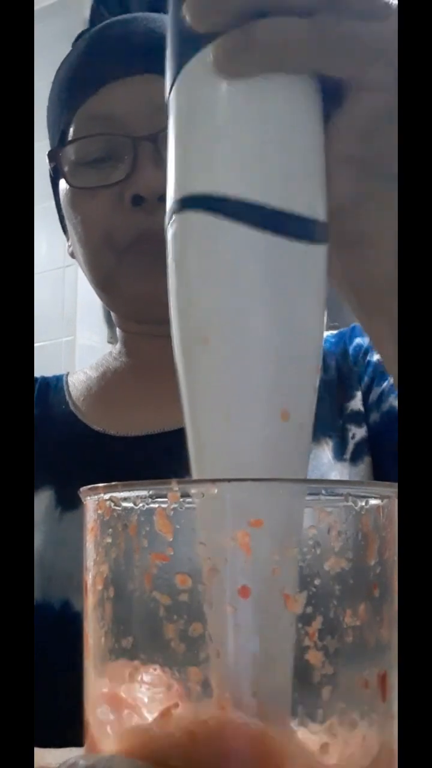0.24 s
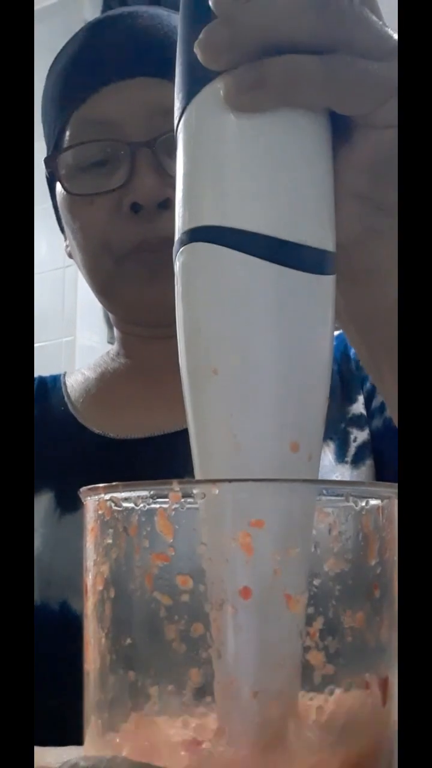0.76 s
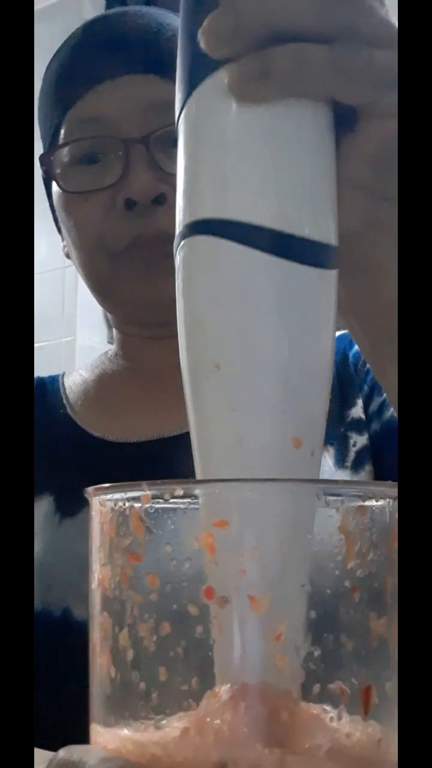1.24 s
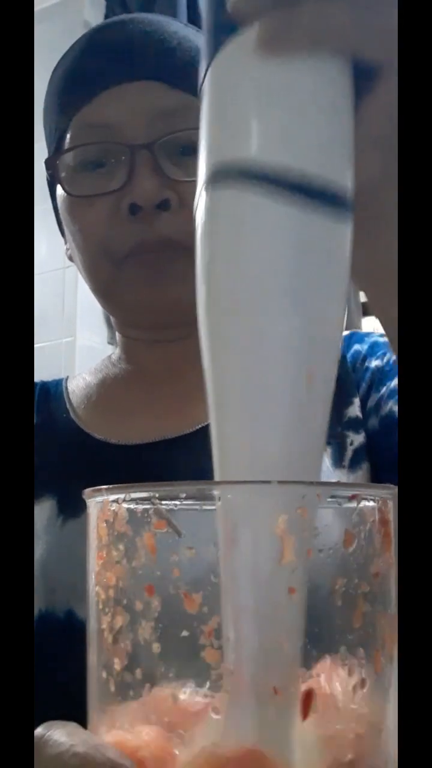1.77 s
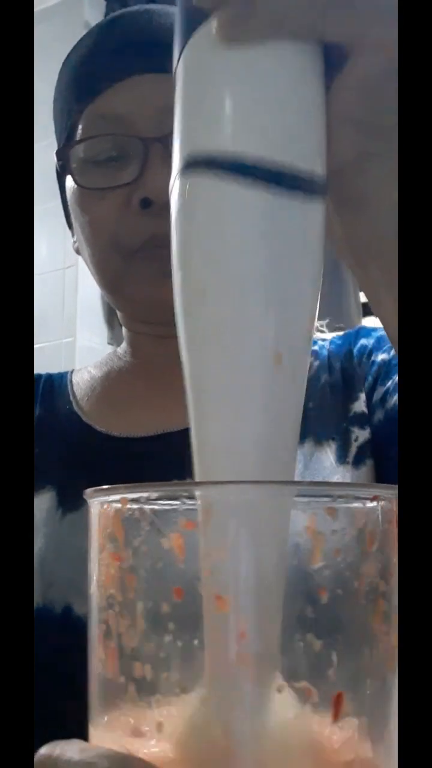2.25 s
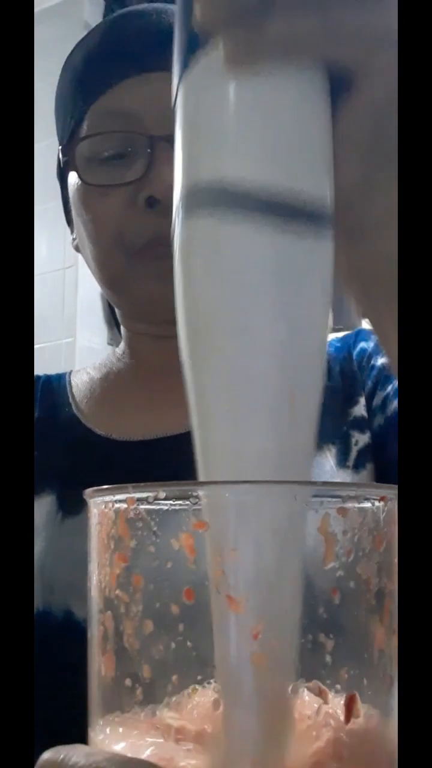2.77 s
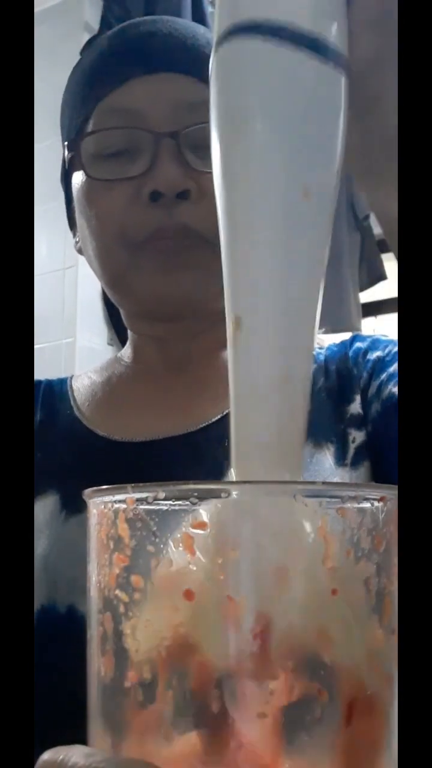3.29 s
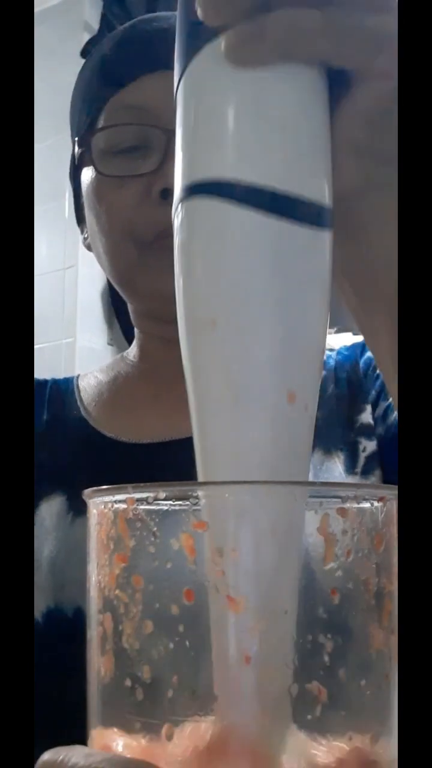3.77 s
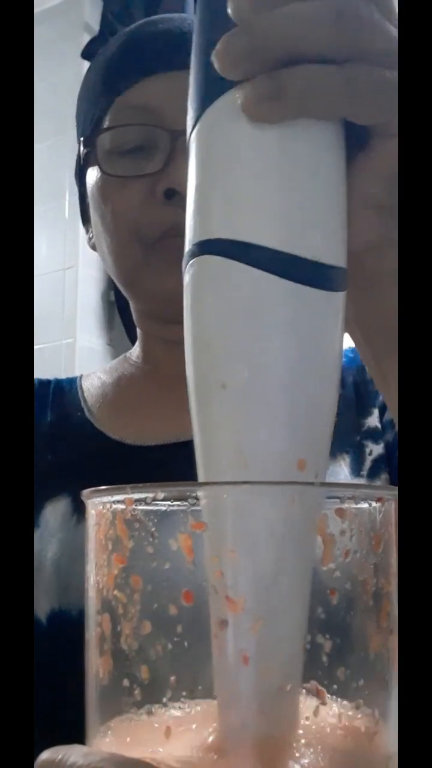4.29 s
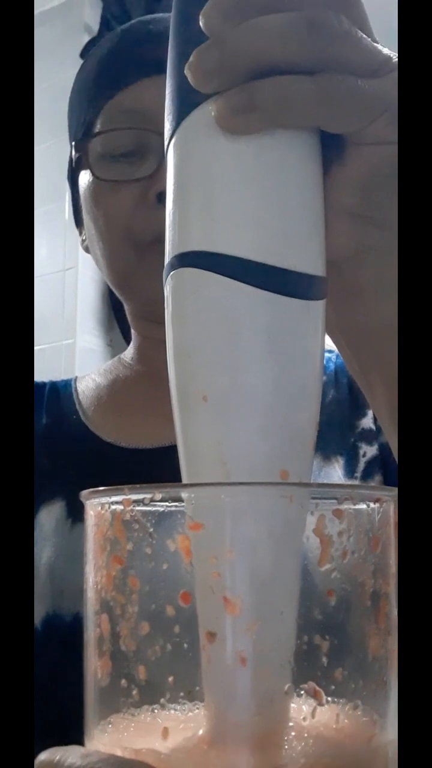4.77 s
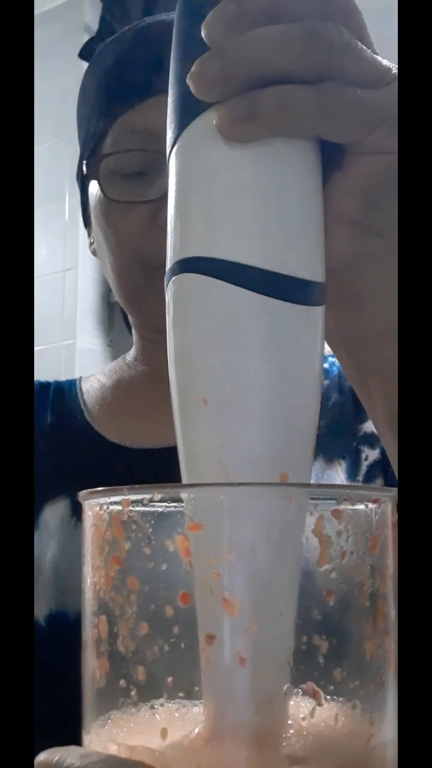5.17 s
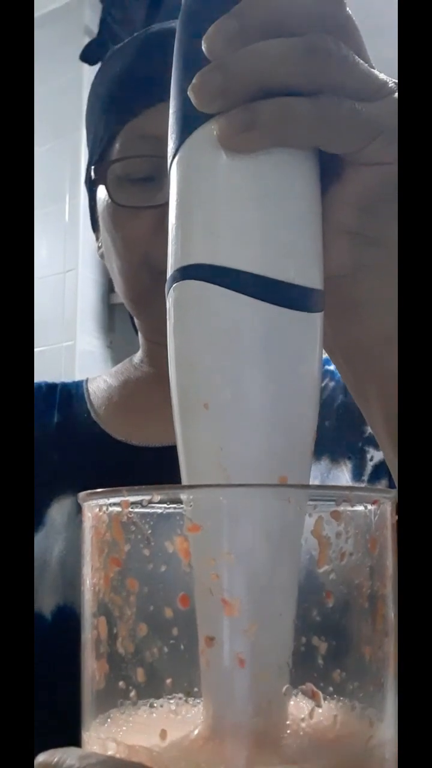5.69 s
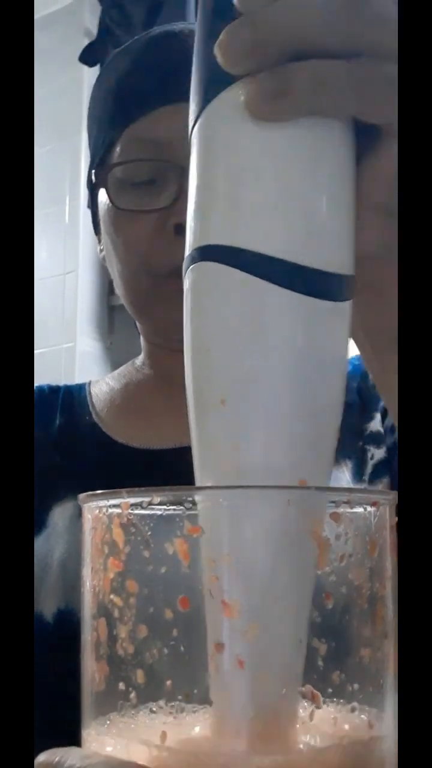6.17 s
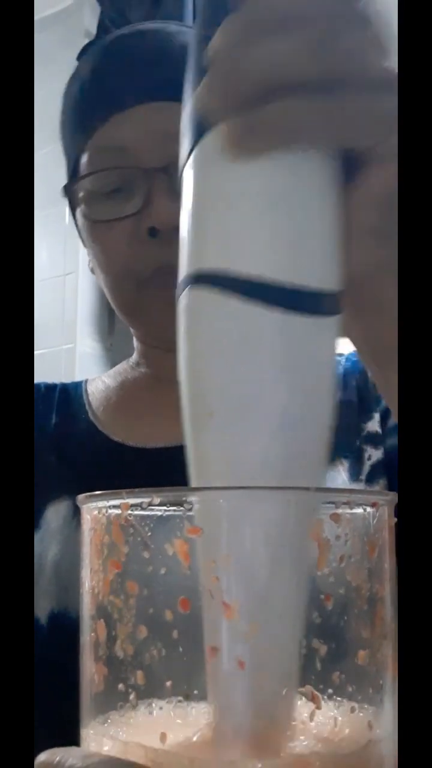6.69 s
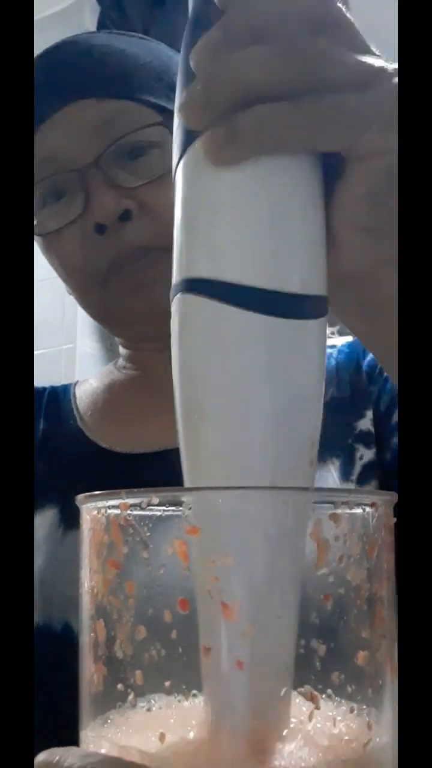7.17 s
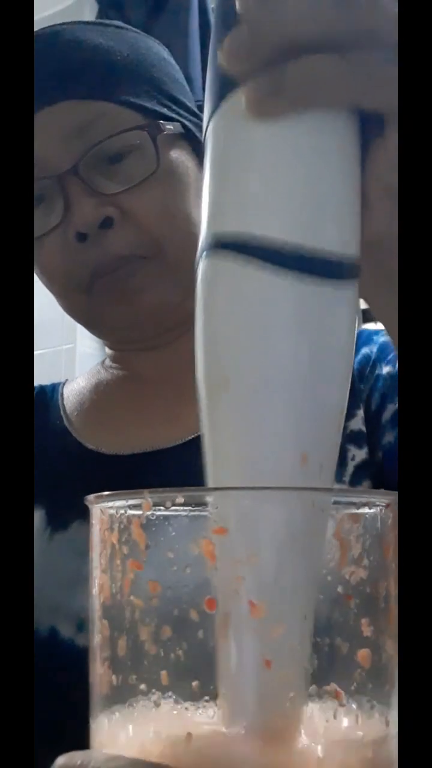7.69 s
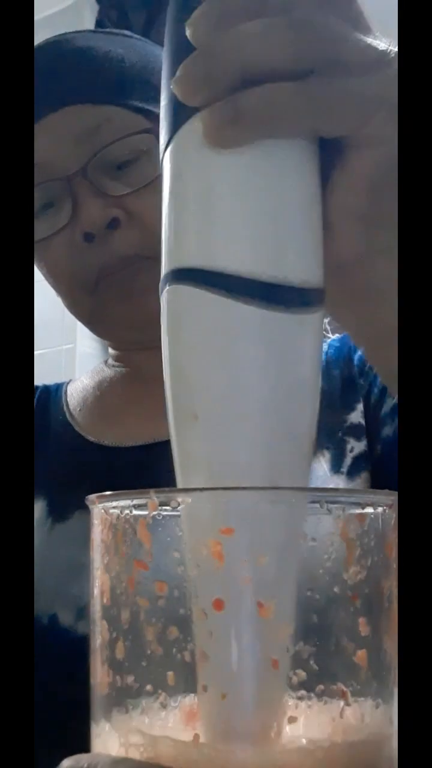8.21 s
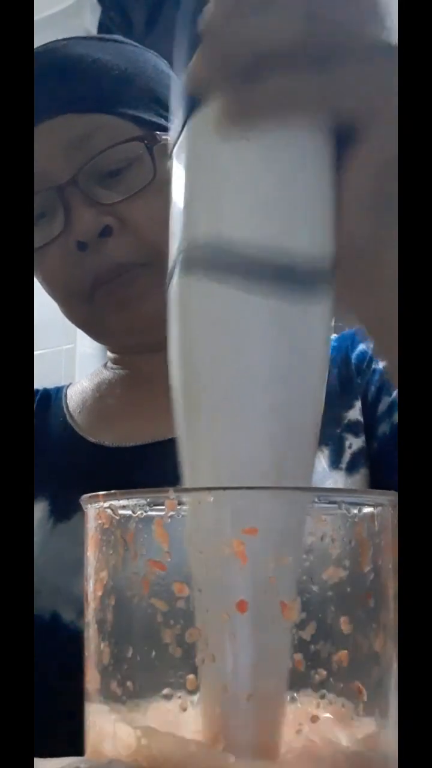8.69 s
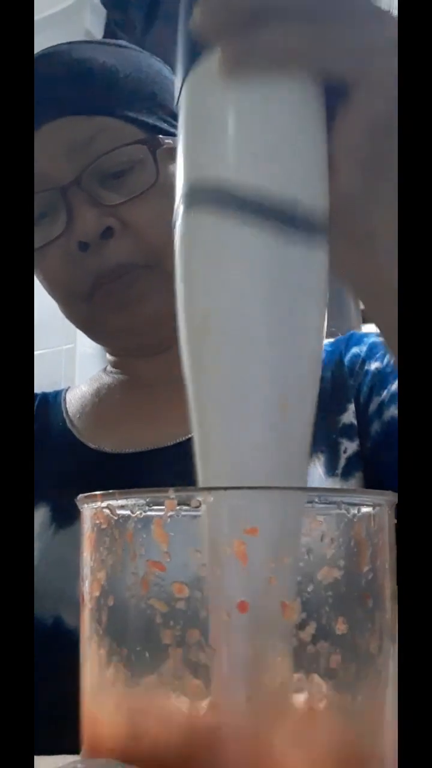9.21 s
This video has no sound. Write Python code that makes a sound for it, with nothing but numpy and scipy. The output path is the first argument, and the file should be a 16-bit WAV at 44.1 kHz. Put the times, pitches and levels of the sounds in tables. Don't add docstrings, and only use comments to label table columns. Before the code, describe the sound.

Close-up pulsing stick blender churns chunky pulp with a rough rattling roar, one longer smoother run mid-way, chunks snapping and motor coasting down in gaps.

```python
import sys
import numpy as np
from scipy import signal
from scipy.fft import rfft, irfft, next_fast_len
from scipy.io import wavfile
from scipy.ndimage import uniform_filter1d

SR = 44100
rng = np.random.default_rng(int(sys.argv[2]) if len(sys.argv) > 2 else 0)


def volts_from_decibels(level):
    exponent = np.asarray(level, float) / 20
    return 10 ** exponent


def digitize_waveform(pressure):
    field = np.atleast_2d(pressure).T
    bounded = np.clip(field, -1, 1)
    quanta = np.round(bounded * 32767).astype(np.int16)
    wavfile.write(sys.argv[1], SR, quanta)


N = 416744
MAINS_HZ = 50


def evened(x):
    return x / np.sqrt(np.mean(x ** 2) + 1e-20)


def read(points, hz):
    f, value = np.transpose(points)
    return np.interp(np.log(hz + 1), np.log(f + 1), value)


def add(mix, s, sound):
    part = mix[round(s * SR):][:len(sound)]
    part += sound[:len(part)]


def shape(x, gain):
    size = next_fast_len(N)
    return irfft(rfft(x, size) * gain(np.fft.rfftfreq(size, 1 / SR)), size)[..., :N]


def band(x, lo_hz, hi_hz):
    return shape(x, lambda f: 1 / np.sqrt((1 + (lo_hz / (f + 1)) ** 8) * (1 + (f / hi_hz) ** 8)))


# switch on in seconds, switch off in seconds, loaded speed in Hz, spin-up time in seconds,
# speed gain in Hz per second.
PRESSES = [(-.2, .255, 104, .03, 0), (.255, .82, 98, .05, 38), (1.015, 1.36, 109, .02, 37),
           (1.36, 1.885, 100, .03, 24), (2.095, 2.42, 103, .045, 36), (2.652, 2.88, 107, .01, 35),
           (3.648, 4.6, 105, .02, 12), (4.6, 5.4, 124, .08, 29), (5.4, 6.12, 148, .05, 20),
           (6.12, 6.607, 162, .05, -14), (6.95, 7.435, 151, .035, 20), (7.795, 8.21, 105, .03, 30),
           (8.21, 8.41, 110, .025, 35), (8.595, 9.09, 104, .025, 30), (9.09, 9.43, 108, .03, 35)]


def rotor():
    drag_per_s, friction_hz, rest_hz = 3.5, 25, 6
    t = np.arange(0, N / SR + .002, .001)
    hz, target, powered = 0 * t, 0 * t, 0 * t
    press = np.zeros(len(t), int)
    speed = rest_hz
    for k, (on, off, loaded_hz, spin_up, gain) in enumerate(PRESSES):
        next_on = PRESSES[k + 1][0] if k + 1 < len(PRESSES) else N

        def run(s):
            return loaded_hz + gain * (s - on) + (speed - loaded_hz) * np.exp(-(s - on) / spin_up)

        def coast(s):
            falling = (run(off) + friction_hz) * np.exp(-drag_per_s * (s - off)) - friction_hz
            return np.maximum(falling, rest_hz)

        now = (t >= on) & (t < next_on)
        s = t[now]
        hz[now] = np.where(s < off, run(s), coast(s))
        powered[now] = s < off
        press[now] = k
        target[now] = loaded_hz + gain * (np.minimum(s, off) - on)
        speed = coast(next_on)
    return t, hz, target, press, powered


def torque(powered):
    return powered * np.cos(2 * np.pi * MAINS_HZ * np.arange(N) / SR)


def bells(rows, t):
    s, width, *cols = np.transpose(rows)
    return np.exp(-.5 * ((t[:, None] - s) / width) ** 2), cols


# beaker boom in dB, spray and brush hiss in dB,
# unbalance hum in dB, commutator whine in dB.
LOADS = [(-17, -30.5, -39, -42), (-17, -31, -41, -42), (-18, -30.5, -38, -41), (-18.5, -28.5, -41.5, -46),
         (-18.5, -30.5, -36.5, -45), (-17.5, -30.5, -43, -47), (-17, -28, -38.5, -51),
         (-17.5, -27.5, -33.5, -43), (-18.5, -28.5, -26, -39.5), (-18.5, -27.5, -25.5, -37),
         (-21.5, -28.5, -31, -40.5), (-17, -28.5, -44, -47), (-16.5, -30, -49, -49),
         (-18.5, -33, -41.5, -44), (-15, -28.5, -42, -47)]
FOOT_DB = [-8, -10, -16, -10.5, -9.5, -11.5, -5.5, -6.5, -12, -13.5, -17, -28, -19, -14, -10.5]
# middle in seconds, width in seconds,
# boom change in dB, spray change in dB.
SURGES = [(.05, 0.021, 2, 7.5), (.23, 0.042, -9.5, -2.5), (.33, 0.12, 2, 4.5), (.8, 0.052, -4.5, 1),
          (1.1, 0.063, 4.5, 0), (1.45, 0.054, -6, -2), (1.63, 0.034, 4, 0.5), (1.74, 0.036, 4, 4),
          (2.26, 0.064, 6.5, 4), (3.77, 0.16, 2, -1.5), (4.3, 0.13, 1, 1), (4.43, .025, 1, 1.5),
          (4.52, 0.0095, 2, 3), (4.61, 0.022, -2.5, 0.5), (4.73, 0.09, 1.5, -0.5), (5.2, 0.15, -1.5, -1),
          (7.12, 0.038, 2, 3), (7.37, 0.065, 2, 2), (7.51, 0.06, -9.5, -3), (8.07, 0.031, 5.5, 0.5),
          (8.2, 0.05, -7, -2), (8.32, 0.062, 5, 3), (8.47, 0.05, -9.5, -5.5), (8.77, 0.023, -4, 2),
          (8.84, 0.056, 3, 4.5), (9.02, 0.059, 3, 4.5), (9.1, .035, -11, -4), (9.27, 0.033, 1, 1.5),
          (9.45, 0.041, -15, -5.5)]
# middle in seconds, width in seconds,
# boom in dB, spray in dB.
SLOPS = [(.94, 0.081, -27, -42), (2.54, 0.004, -25, -45), (2.615, 0.035, -30, -44), (3.02, 0.032, -43, -44),
         (3.36, 0.006, -19.5, -38), (3.47, 0.047, -34, -50), (3.57, 0.046, -42, -55),
         (2.67, 0.021, -16.5, -35), (6.9, 0.078, -39, -45), (7.76, 0.046, -42, -49),
         (7.61, 0.054, -23, -35.5), (7.82, .015, -20, -53), (8.57, 0.054, -24.5, -40)]
THIN_HZ = 118, 138


def levels(t, hz, target, press, powered):
    boom, spray, hum, whine = uniform_filter1d(np.array(LOADS)[press], 25, 0).T
    hum = uniform_filter1d(hum, 301)
    slack_db = 20 * np.log10(hz / target)
    grip_db = np.minimum(20 * np.log10(hz / np.minimum(target, 128.4)), 0)
    surge, (surge_boom, surge_spray) = bells(SURGES, t)
    slop, (slop_boom, slop_spray) = bells(SLOPS, t)

    def with_slops(level_db, slop_db):
        return 10 * np.log10(volts_from_decibels(2 * level_db) + slop ** 2 @ volts_from_decibels(2 * slop_db))

    boom = with_slops(boom + 2.86 * grip_db + surge @ surge_boom, slop_boom)
    spray = with_slops(spray + 2.9 * grip_db + surge @ surge_spray, slop_spray)
    slosh = 0.78 * spray + (1 - 0.78) * boom + 1.5
    foot = boom + uniform_filter1d(np.array(FOOT_DB, float)[press], 101)
    free_db = 7.5 * np.interp(target, THIN_HZ, [0, 1]) * (1 - powered)
    return boom, foot, slosh, spray, hum + 5.0 * slack_db, whine + 1.7 * slack_db + free_db


# frequency in Hz, level in dB per Hz.
COLOUR = [(21, -84), (35, -42), (97, -17.5), (251, -7.5), (300, -1.5), (332, -8.5), (488, -6), (554, -14),
          (2040, -23), (3870, -30), (8340, -31), (10800, -44), (13600, -37), (15800, -42)]
# frequency in Hz, width in Hz, boost in dB.
BEAKER = [(162.2, 17.4, 11.5), (218, 58, 6.5), (307, 61, 9), (371.5, 41, 6.5), (480.5, 57, 5.5),
          (631.5, 51, 4.5), (950, 670, 6), (1499, 97, 6), (2037, 95, 6.5), (5330, 720, 5), (6100, 160, 5.5),
          (8470, 260, 5), (11900, 2100, 4)]


def body_db(hz):
    return read(COLOUR, hz) + sum(db / (1 + (2 * (hz - f) / w) ** 2) for f, w, db in BEAKER)


def knocks(per_s, spread_db, t60):
    heights = volts_from_decibels(spread_db * np.minimum(rng.exponential(1, N), 2.5))
    size = heights * (rng.random(N) < per_s / SR)
    return evened(signal.lfilter([1], [1, -np.exp(-np.log(1000) / (t60 * SR))], size))


def churn(powered, boom_db, foot_db, slosh_db, spray_db):
    lumps = knocks(70, 2.5, t60=0.064)
    chips = knocks(70, 3.5, t60=0.009)
    layers = [(430, 480, foot_db, 1.2 + 0.8 * lumps + .3 * chips, 0.043),
              (25, 970, boom_db, 1.66 + .5 * lumps + 0.19 * chips, .1),
              (702, 2620, slosh_db, 1.4 + 0.26 * lumps + .5 * chips, 0.043),
              (2340, 14000, spray_db, 1.37 + 0.082 * lumps + 0.49 * chips, 0.049)]
    out = 0
    for lo_hz, hi_hz, level_db, kicks, throb in layers:
        drive = rng.standard_normal((2, N)) * kicks * (1 + throb * torque(powered))
        ringing = shape(drive, lambda f: volts_from_decibels(body_db(f)))
        out = out + evened(band(ringing, lo_hz, hi_hz)) * volts_from_decibels(level_db + 3.0)
    return ports(*out)


# frequency in Hz, width in Hz, level in dB.
HOUSING = [(1700, 700, -1), (2700, 700, 0), (3500, 600, -14), (4650, 1400, 4), (6200, 700, -3),
           (8000, 1300, 6), (11800, 1400, -5), (15000, 1200, -5)]


def motor(hz, hum_db, whine_db, powered):
    segments = 24
    wobble = evened(uniform_filter1d(rng.standard_normal(N), 300))
    lurch = evened(uniform_filter1d(wobble, 900))
    jolted_hz = hz * (1 + np.interp(hz, THIN_HZ, [.1, .004]) * lurch)
    angle = 2 * np.pi * np.cumsum(jolted_hz) / SR
    hum = sum(volts_from_decibels(db) * np.sin(k * angle) for k, db in [(1, 0), (2, -5), (4, -14)])
    hum = np.sqrt(2) * volts_from_decibels(hum_db) * hum

    ripple = np.roll(torque(powered), -SR // (4 * MAINS_HZ))
    bar_hz = segments * hz * (1 + .03 * ripple + .005 * wobble * (.4 + powered))
    turns = np.cumsum(bar_hz) / SR
    whine = 0
    for k in range(1, 19):
        loud = sum(volts_from_decibels(db) / (1 + (2 * (k * bar_hz - f) / w) ** 4) for f, w, db in HOUSING)
        loud = loud * (k * bar_hz < 15500)
        waver = 1 + .38 * evened(uniform_filter1d(rng.standard_normal(N), 400))
        tone = np.cos(2 * np.pi * (k * turns + rng.random()))
        whine = whine + loud * waver * volts_from_decibels(-.7 * k) * tone
    once_a_turn = np.cos(2 * np.pi * turns / segments)
    sparking = (1 + .85 * torque(powered)) * (1 + .3 * powered * once_a_turn)
    return hum + whine * volts_from_decibels(whine_db) * sparking


# start in seconds, peak in dB, low part in dB against the peak, centre in Hz.
CRACKS = [(0.1343, -13, 9, 5950), (0.178, -11, -8, 5400), (0.301, -6, 3, 5330), (0.4676, -15, -14, 6010),
          (0.595, -11, 8, 7520), (0.758, -12, 7, 5310), (1.369, -10, 8, 5240), (1.5837, -6.5, 4, 6800),
          (1.7247, -12, -8, 3500), (1.8064, -11, -8, 5360), (1.8992, -9, 7, 5320), (2.6568, -9, 1, 5430),
          (2.6858, -18, -8, 7540), (3.8839, -13, 3, 4800), (3.9574, -12, -8, 6430), (4.0146, -9, 7, 6100),
          (4.098, -16, -3, 5150), (4.3577, -9, 4, 5700), (4.841, -13, -7, 6110), (5.8739, -21, -11, 7930),
          (7.2438, -9, -3, 5330), (8.4055, -11.5, 7.5, 5130), (8.7212, -14.5, 14.5, 8310),
          (9.0322, -13, 2, 4760), (9.1727, -12, -6, 5840),
          (0.956, -17, 1, 6250), (2.0957, -31, 17.5, 5360), (2.1336, -31, -2, 3070), (3.016, -35, 22, 3500),
         (3.143, -50.5, 26.5, 3500), (3.3465, -16, 5, 3200), (7.804, -32, 12, 3500), (8.534, -46, 9, 3500),
         (8.98, -22, 16, 3500), (3.058, -26, 7, 7030), (3.102, -21, -3, 8110), (3.2311, -40, -4, 6950),
         (3.3154, -42, 13, 5110), (3.347, -11, -8, 6300), (3.5203, -28, -11, 5660), (3.5548, -46, 10, 3000),
         (3.6485, -30, 9, 4960), (6.9576, -22, -14, 8240), (6.975, -20, -10, 4900),
         (7.5491, -15, -13, 8100), (7.817, -34, 2, 3550), (8.5573, -26, 0, 8160), (8.608, -12.5, -5, 8180),
         (8.6446, -30, -4, 8380)]


def snaps_and_ticks():
    out, t = np.zeros(N), np.arange(4000) / SR
    for s, db, low_db, hz in CRACKS:
        crack = rng.standard_normal(len(t)) * (volts_from_decibels(-60 * t / 0.011) + 0.077 * volts_from_decibels(-60 * t / 0.027))
        bright_band = signal.butter(1, [0.82 * hz, 1.06 * hz], "band", fs=SR, output="sos")
        dull_band = signal.butter(2, [600, 2500], "band", fs=SR, output="sos")
        bright = signal.sosfilt(bright_band, crack)
        dull = signal.sosfilt(dull_band, crack)
        add(out, s, volts_from_decibels(db - 0.5) * bright / abs(bright).max())
        add(out, s, volts_from_decibels(db + low_db - 7.0) * dull / abs(dull).max())
    return out


# start in seconds, peak in dB, pitch in Hz,
# time to fall by 60 dB in seconds.
BUMPS = [(1.421, -14, 355, 0.011), (2.096, -22, 313, 0.036), (3.015, -17, 344, 0.035),
         (3.143, -28, 335, 0.04), (3.234, -35, 297, 0.05), (3.348, -11.5, 334, 0.032),
         (3.555, -16, 744, 0.031), (6.819, -15.5, 295, 0.041), (7.003, -14, 292, 0.023),
         (7.715, -21.5, 754, 0.027), (8.535, -31, 270, 0.05), (8.98, -6, 257, 0.037)]


def beaker_bumps():
    out, t = np.zeros(N), np.arange(4000) / SR
    modes = [(1, 0), (1.12, -6), (1.4, -12), (1.7, -6), (2.1, -15), (.55, -9)]
    for s, db, hz, t60 in BUMPS:
        ring = sum(volts_from_decibels(g) * np.sin(2 * np.pi * hz * r * t) for r, g in modes)
        add(out, s, volts_from_decibels(db - 60 * t / t60) * ring * np.minimum(t / 0.00097, 1))
    return out


def kitchen(x):
    taps, at = np.zeros(9000), np.arange(150, 8980, 20)
    signs = rng.choice([-1., 1.], len(at))
    taps[at + rng.integers(0, 20, len(at))] = signs * volts_from_decibels(-60 * at / SR / 0.11)
    return signal.oaconvolve(x, taps / np.linalg.norm(taps))[:N]


# frequency in Hz, level in dB per Hz.
FLOOR = [(21, -32), (35, -12), (129, 11.5), (204, -8), (350, -3), (583, -13), (834, -14), (2320, -26),
         (15800, -34)]


def room_hush():
    noise = shape(rng.standard_normal((2, N)), lambda f: volts_from_decibels(read(FLOOR, f)))
    return ports(*(volts_from_decibels(-40.5) * evened(noise)))


# frequency in Hz, level in dB.
LEFT_RIGHT = [(60, -1.5), (110, -7.5), (200, -5.5), (380, -8), (700, -8.5), (1290, -10.5), (2380, -6.5),
              (4400, -10), (8120, -19), (15000, -4)]
# frequency in Hz, likeness from 0 to 1.
LIKENESS = [(40, 0.3), (130, 0.8), (300, 0.79), (640, 0.8), (1400, 0), (3000, 0.31), (8000, 0.1),
            (15000, 0.2)]


def ports(x, twin):
    lead_s = 10 / SR

    def same(f):
        return np.clip(read(LIKENESS, f), 0, 1)

    shared = shape(x, lambda f: same(f) * np.exp(2j * np.pi * f * lead_s))
    left = shared + shape(twin, lambda f: np.sqrt(1 - same(f) ** 2))
    return np.array([shape(left, lambda f: volts_from_decibels(read(LEFT_RIGHT, f))), x])


def scene():
    t, hz, target, press, switch = rotor()
    switch = uniform_filter1d(switch, 9)
    controls = [hz, switch, *levels(t, hz, target, press, switch)]
    hz, powered, *churn_db, hum_db, whine_db = [np.interp(np.arange(N) / SR, t, c) for c in controls]
    hits = band(snaps_and_ticks() + beaker_bumps(), 165, 10300)
    near = motor(hz, hum_db, whine_db, powered) + hits
    wet = near + volts_from_decibels(-10) * kitchen(near)
    return churn(powered, *churn_db) + volts_from_decibels(3.0) * ports(wet, kitchen(near)) + room_hush()


def low_pass(x):
    return signal.sosfilt(signal.butter(12, 16240, fs=SR, output="sos"), x)


def record(dry):
    over = np.maximum(abs(dry) - .7, 0)
    rounded = dry - np.sign(dry) * (over - .32 * np.tanh(over / .32))
    mix = shape(rounded, lambda f: 1 / np.sqrt((1 + (48 / (f + 1)) ** 6) * (1 + (f / 15400) ** 200)))
    return low_pass(mix)


dry = scene()
out = record(dry)
digitize_waveform(out)
```